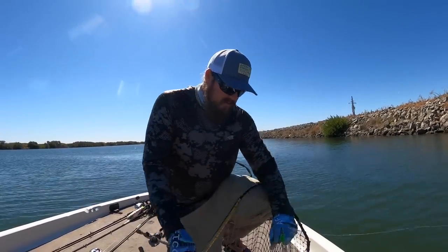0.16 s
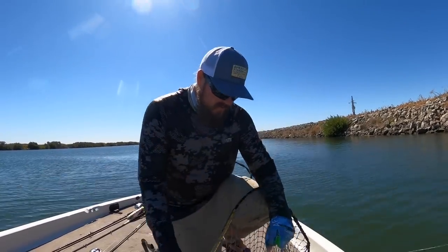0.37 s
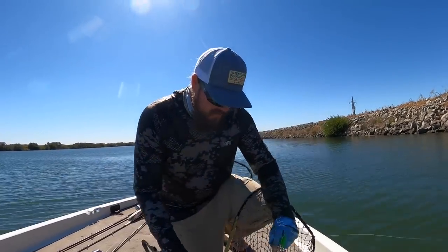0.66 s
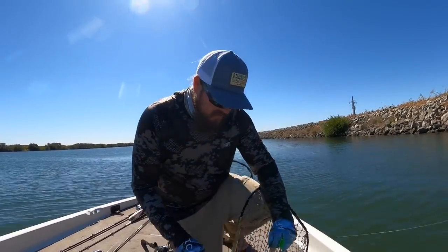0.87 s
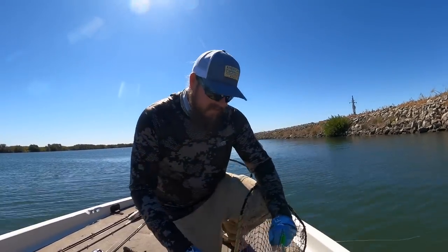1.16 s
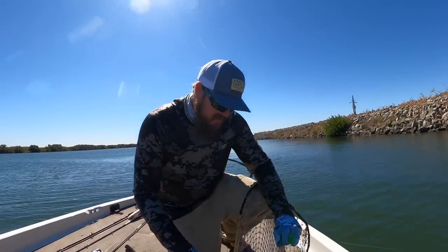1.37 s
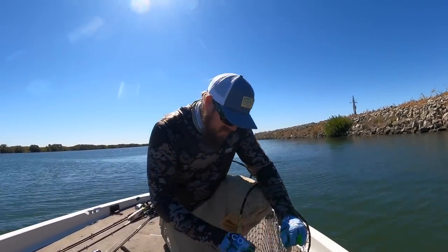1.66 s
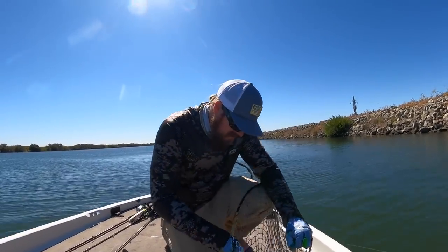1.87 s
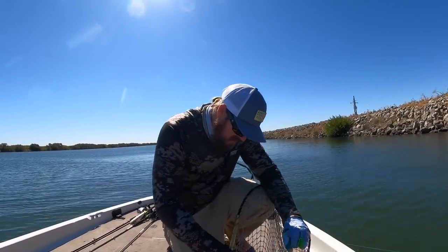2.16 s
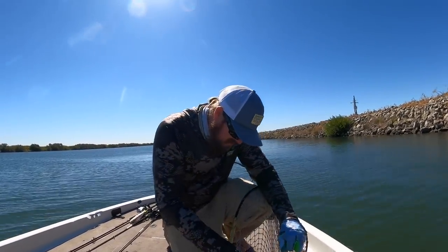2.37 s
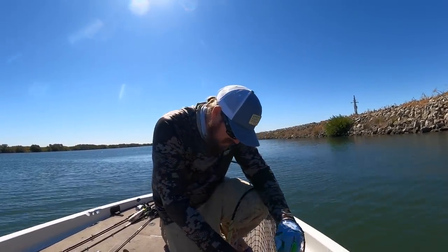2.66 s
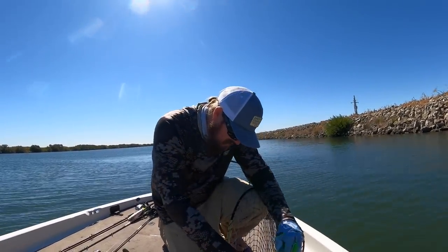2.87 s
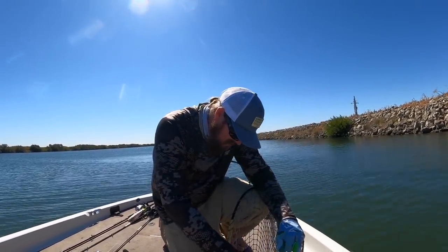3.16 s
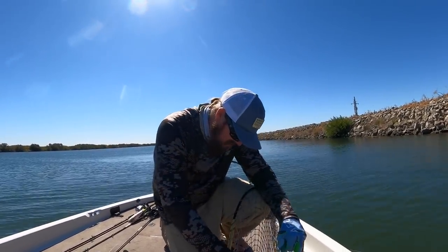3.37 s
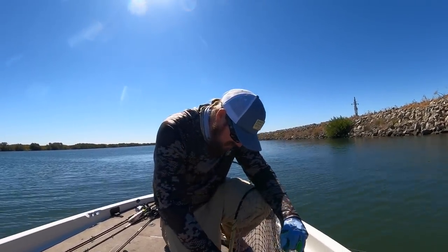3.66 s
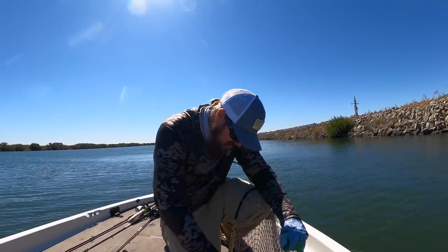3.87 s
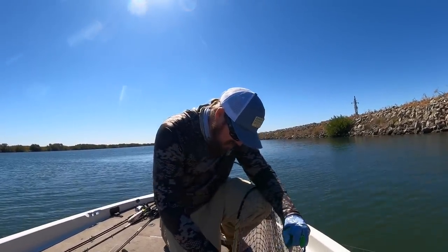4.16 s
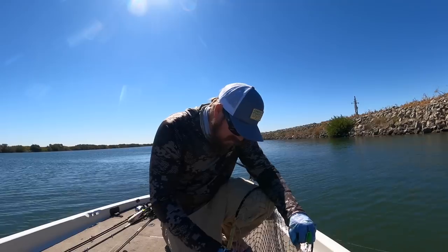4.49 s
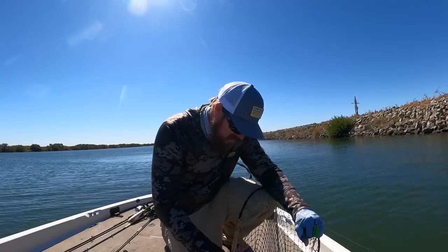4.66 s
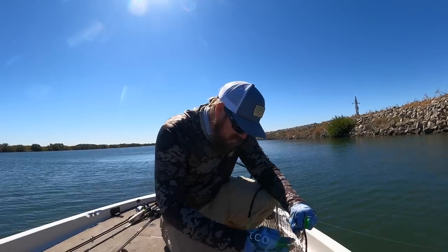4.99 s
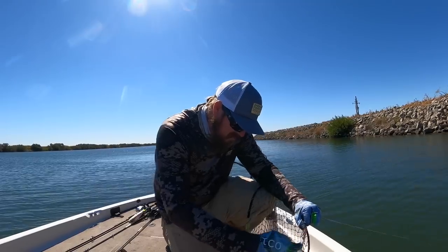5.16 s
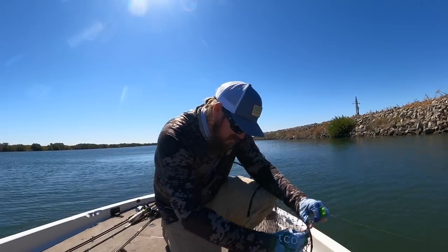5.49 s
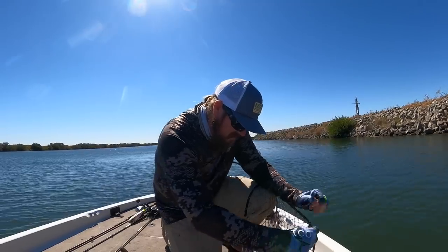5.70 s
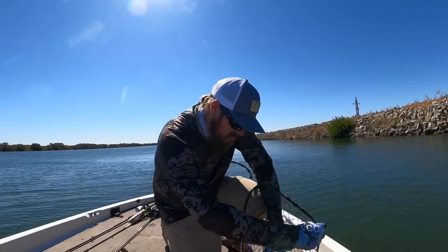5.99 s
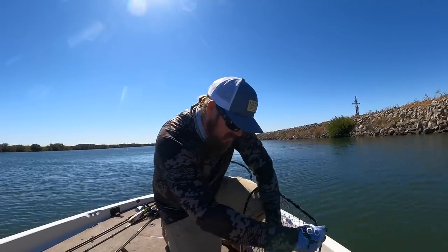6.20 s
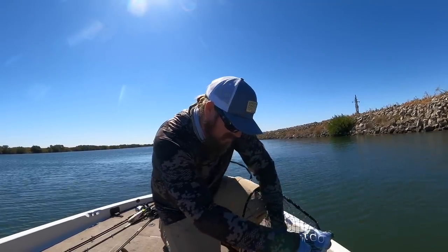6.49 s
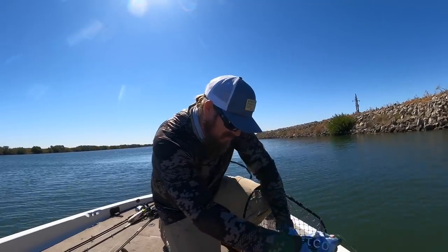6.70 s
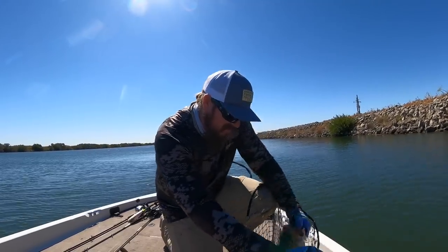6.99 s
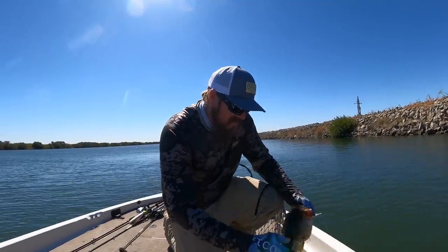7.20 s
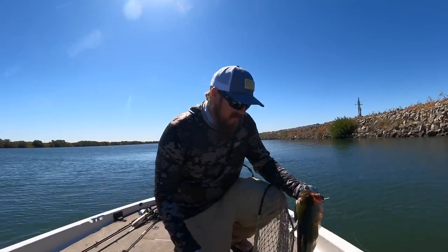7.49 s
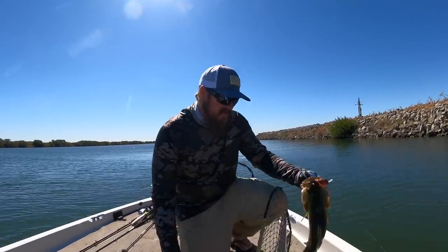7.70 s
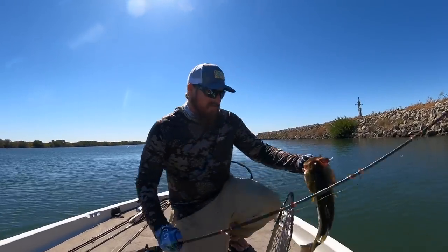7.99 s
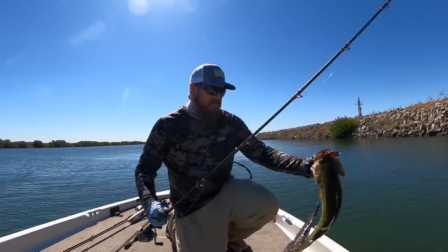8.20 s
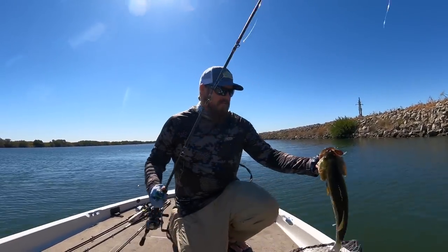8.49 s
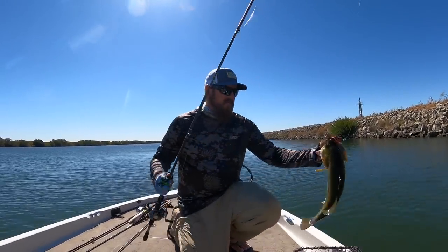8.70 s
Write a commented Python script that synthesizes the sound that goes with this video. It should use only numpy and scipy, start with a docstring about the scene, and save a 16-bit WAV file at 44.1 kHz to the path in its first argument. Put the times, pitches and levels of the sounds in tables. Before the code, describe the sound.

On a small boat, fishing gear cracks, rattles and scrapes in clusters with quiet gaps, a net frame bounces, and soft wind rumbles.

```python
"""Small boat on a calm lake: a rod is laid down, a landing net dragged and dropped, lure hooks tick on gear.
Hard clicks are noise cracks that ring modes of rod and gear; low thumps, from blows on the hollow deck and
probably some wind buffets or water slaps, are dying modes, as is the net frame. Small metal tings.
Mesh scrapes in strokes: dense random slips through broad resonances. A light breeze rumbles on the microphone
and laps the hull, as lumpy filtered noise; open water is a faint wash of noise in drifting patches."""
import sys
import numpy as np
from scipy import signal
from scipy.io import wavfile
from scipy.ndimage import uniform_filter1d

SR = 44100
rng = np.random.default_rng(int(sys.argv[2]) if len(sys.argv) > 2 else 0)


def transcribe(u):
    """Save the signal u as a 16-bit wav file named by the first command-line argument.

    u: samples, shape (n,) or (channels, n), limited to [-1, 1]; the rate is SR.
    q: integer samples, one column per channel.
    """
    v = np.clip(np.atleast_2d(u).T, -1, 1)
    q = np.round(v * 32767).astype(np.int16)
    wavfile.write(sys.argv[1], SR, q)


def field_ratio(decibels):
    """Amplitude ratio for a level in dB (20 dB per decade); scalars and array-likes work."""
    return 10 ** (np.asarray(decibels, dtype=float) / 20)


N = 390285  # samples


def evened(x):
    """Scales to rms 1."""
    return x / np.sqrt(np.mean(x ** 2) + 1e-20)


def peaked(x):
    """Scales to peak 1."""
    return x / (abs(x).max() + 1e-20)


def read(points, hz):
    """Reads a spectrum on a log-frequency axis."""
    f, value = np.transpose(points)
    return np.interp(np.log(hz + 1), np.log(f + 1), value)


def curve(rows, column=1):
    """One column of a time table, one value a sample."""
    return np.interp(np.arange(N) / SR, [r[0] for r in rows], [r[column] for r in rows])


def add(mix, start_s, sound):
    """Mixes a sound in at start_s."""
    part = mix[round(start_s * SR):][:len(sound)]
    part += sound[:len(part)]


def colour(x, points):
    """Minimum-phase filter with the gain of a spectrum table, floored at -100 dB."""
    gain_db = read(points, abs(np.fft.fftfreq(8192, 1 / SR)))
    log_gain = np.log(field_ratio(np.maximum(gain_db, -100)))
    taps = np.fft.ifft(np.exp(np.conj(signal.hilbert(log_gain)))).real[:4096]
    return signal.oaconvolve(x, taps)[:len(x)]


def resonance(x, hz, q):
    """One resonant mode driven by x."""
    return signal.lfilter(*signal.iirpeak(hz, q, SR), x)


def ring(hz, db, t60_s, rise_s, spread):
    """Dying modes, detuned and weighted a little differently every time."""
    t = np.arange(round(.3 * SR))[:, None] / SR
    weight, detune = rng.standard_normal((2, len(hz)))
    decay = field_ratio(db + 2.2 * weight - 60 * t / t60_s)
    modes = decay * np.sin(2 * np.pi * hz * (1 + spread * detune) * t)
    return modes.sum(1) * (1 - np.exp(-(t[:, 0] / rise_s) ** 2))


def crack(hz, t60_s):
    """A sharp first contact, then a weaker chatter of small bounces, strongest around hz."""
    t = np.arange(round(.15 * SR)) / SR
    noise, bounce = rng.standard_normal((2, len(t)))
    chatter = noise * (.35 + 2.2 * (bounce > 2.1)) * field_ratio(-60 * t / t60_s)
    burst = chatter + 2.2 * noise * np.exp(-t / .0012)
    burst[:3] += 7.0 * np.array([.5, 1, -.5])
    wide = signal.lfilter([1, -.85], [1], burst)
    return peaked(0.3 * wide + resonance(burst, hz, 2.2))


def rattled(x, decay_s):
    """A blow is a first contact followed by a few ms of chatter."""
    chatter = 0.018 * rng.standard_normal(600) * np.exp(-np.arange(600) / SR / decay_s)
    chatter[0] = 1
    return peaked(signal.oaconvolve(x, chatter))


def thud(hz, t60_s):
    """Dense low noise whose upper part dies first."""
    t = np.arange(round(.2 * SR)) / SR
    low, high = rng.standard_normal((2, len(t)))
    low_band = signal.butter(2, [0.18 * hz, hz], "band", fs=SR)
    high_band = signal.butter(1, [hz, 2.7 * hz], "band", fs=SR)
    low = signal.lfilter(*low_band, low * field_ratio(-60 * t / t60_s))
    high = signal.lfilter(*high_band, high * field_ratio(-60 * t / (0.45 * t60_s)))
    return peaked(low + 0.34 * high)


# Water and air. Each row: time in seconds, wash level in dB, thin treble hiss level in dB.
WASH_LEVELS = [(0, -49, -68.5), (.47, -51.5, -62), (1.3, -50.5, -81.5), (2.6, -45.5, -97.5), (3, -55, -94),
               (3.6, -54, -99.5), (5.1, -51.5, -94.5), (5.74, -61, -87.5), (6, -52.5, -85),
               (6.6, -51.5, -86.5), (6.8, -51, -78.5), (7.5, -45, -80.5), (8.3, -51, -76.5),
               (8.85, -44.5, -80.5)]
# Wash spectrum; the first and the last two rows are not used. Each row: Hz, relative density in dB per Hz.
WASH_SPECTRUM = [(180, -30), (300, -0.5), (447, -9), (656, -9), (925, -15.5), (1250, -14), (2740, -18.5),
                 (5520, -28), (8000, -25.5), (10400, -75), (17600, -120)]


def wash():
    """Faint wide noise in drifting patches; it brightens when the hiss comes up."""
    frames, hz = N // 128 + 5, np.fft.rfftfreq(512, 1 / SR)
    real, imag, patches = rng.standard_normal((frames, 257, 3)).T
    patches = evened(uniform_filter1d(uniform_filter1d(patches, 8, 0), 16, 1))
    tone_db = read(WASH_SPECTRUM[1:-2], hz) - 40 * (hz < 250)
    times_s, _, hiss_db = np.transpose(WASH_LEVELS)
    lift_db = np.interp(np.arange(frames) * 128 / SR, times_s, hiss_db) - hiss_db.mean()
    tilt_db = .15 * np.outer(np.log2(np.maximum(hz, 1200) / 1200), lift_db)
    z = (real + 1j * imag) * field_ratio(tone_db[:, None] + tilt_db + 2.6 * patches)
    noise = signal.istft(z, nperseg=512, noverlap=384)[1][:N]
    return field_ratio(curve(WASH_LEVELS)) * evened(noise)


# Strength of the breeze. Each row: time in seconds, level in dB.
BREEZE_LEVELS = [(0, -52.5), (.6, -58.5), (.8, -36), (.95, -47), (1.3, -60), (1.65, -44.5), (2.1, -51.5),
                 (3.1, -57), (3.27, -41), (3.42, -53.5), (4.2, -56.5), (4.55, -34), (4.75, -38.5),
                 (4.95, -57.5), (5.55, -62), (7.5, -56.5), (8.2, -59.5), (8.8, -57)]
# Wind on the microphone. Each row: Hz, relative density in dB per Hz.
GUST_SPECTRUM = [(15, -33), (30, -5.5), (60, 4), (100, 6), (150, -2), (250, -52.5)]
# Hull rumble. Each row: Hz, relative density in dB per Hz.
HULL_SPECTRUM = [(60, -44), (120, -2), (190, 3.5), (300, -8), (450, -15), (800, -46)]
LAP_DB, LAP_SHARE = -54, 0.71  # lapping in a breeze of -57.5 dB; dB it follows per dB of breeze
BOOM_DB, BOOM_S = -26, 0.053  # hull rumble against the knocks; time constant of their smoothed power


def breeze(knocks):
    """Lumpy low noise: deep on the microphone, upper from the hull, lapped by water, swelling with knocks."""
    unevenness = uniform_filter1d(uniform_filter1d(rng.standard_normal((2, N)), 900), 900)
    lumps = field_ratio(4.2 * evened(unevenness))
    deep = evened(lumps[0] * colour(rng.standard_normal(N), GUST_SPECTRUM))
    upper = evened(lumps[1] * colour(rng.standard_normal(N), HULL_SPECTRUM))
    keep = np.exp(-1 / (BOOM_S * SR))
    shaken = field_ratio(BOOM_DB) * np.sqrt(signal.lfilter([1 - keep], [1, -keep], knocks ** 2))
    breeze_db = curve(BREEZE_LEVELS)
    lapping = field_ratio(LAP_DB + LAP_SHARE * (breeze_db + 57.5))
    return field_ratio(breeze_db) * deep + (lapping + shaken) * upper


# Hooks, rod and reel. Each row: start in seconds, peak in dB, low gear part against it in dB, brightest Hz.
CLICK_ROWS = [(0.0316, -17, -16.5, 2030), (0.0671, -27, -6, 6600), (0.0922, -24.5, -33, 3320),
              (0.172, -33.5, -28, 4000), (.323, -27, -21, 3270), (0.447, -27, -18, 3130),
              (.47, -16, -22, 2520), (0.5238, 5, -21, 4800), (.5394, -4, -10, 3540),
              (0.5584, -22, -1, 4500), (0.5856, -5, -8.5, 3940), (0.643, -10.5, -9.5, 4970),
              (0.69, -19, -19, 3500), (0.6959, -0.5, -21, 5400), (.7212, -5.5, -23, 4940),
              (0.7298, -15.5, -4, 4930), (0.764, -17, -12, 4940), (0.7774, -11, -24, 5350),
              (0.7954, -10.5, -6, 2600), (0.8686, -10.5, -17, 5500), (0.886, -19, -16, 5630),
              (1.5705, -26, -7.5, 2790), (1.5898, 5.5, -20.5, 4640), (1.646, -24, -1, 2230),
              (1.663, -21.5, -5, 3550), (1.6877, -21, -8, 2480), (1.7044, -19.5, -7.5, 2010),
              (1.7335, -13.5, -18, 2010), (1.7474, -0.5, -12, 2630), (1.8169, -12, -10, 2100),
              (1.8859, -4.5, -7.5, 3020), (1.9133, -5, -9.5, 2980), (1.9432, -13.5, -7.5, 2480),
              (1.969, -14.5, -3.5, 2230), (2.1016, -12.5, -10, 2310), (2.1293, -8, -15.5, 3330),
              (2.218, -18.5, -10, 2620), (2.2503, -15.5, -15, 3420), (2.286, -29, -1, 2110),
              (2.337, -25.5, -25, 3230), (2.3963, -20, -13, 3750), (2.5099, -16.5, -10.5, 3560),
              (2.5654, -21, -8.5, 3860), (2.811, -31, -25, 2810), (3.7802, -32.5, -15, 3920),
              (3.8849, -28, -36, 3880), (3.907, -28.5, -18, 3800), (4.0615, -28.5, -20, 3370),
              (4.3412, -29, -11, 4150), (4.36, -18, -11, 3300), (4.398, -28, -26, 5500),
              (5.7607, -11.5, -27.5, 6400), (5.7882, -20, -21, 6510), (5.8197, -18.5, -25, 5700),
              (5.8594, -27, -21, 6350), (5.9, -40, -20, 6400), (6.2156, -22, -6.5, 2510),
              (7.1492, -8, -26, 5100), (7.172, -16.5, -30, 4440), (7.244, -25, -26, 3520),
              (7.299, -34, -3, 6500), (7.3294, -36, -22, 6500), (7.3448, -21.5, -28, 2750),
              (7.3625, -6.5, -18.5, 2670), (7.445, -33, -12, 2670), (7.4827, -11.5, -18.5, 2670),
              (7.512, -10.5, -21.5, 3230), (7.5258, -7.5, -21, 2580), (7.5377, -10, -16, 2670),
              (7.5855, -25.5, -12, 2630), (7.653, -29, -10, 2230), (7.6942, -21, -12, 2500),
              (7.7798, -29, -10, 2730), (7.852, -15, -18, 2000), (8.5657, -5.5, -36, 6580),
              (8.7148, -28, -6, 3720), (8.7252, 2, -11.5, 3790), (8.7502, -18, -2, 2590),
              (8.7615, -5.5, -21, 3330), (8.828, -30, -9, 3450)]
# Low modes of the gear. Each row: Hz, level in dB, t60 as a factor on the click's.
GEAR_MODES = [(976, -5, 0.76), (1144.6, -5.5, 1.1), (1401, -5.5, 0.81), (1686, 0, 0.5), (2010, -11.5, 1.4)]
# Modes of stiff small parts. Each row: Hz, level in dB.
PART_MODES = [(2330, -17), (2750, 3.5), (3300, 3), (3750, 3), (4200, -0.5), (4650, -3), (5050, 0.5),
              (5400, 3.5), (5850, 3), (6500, 7.5), (7250, 8.5)]
CLICK_T60_S, SHORTER_PER_DB = 0.06, 0.0025  # t60 base of a -24.5 dB click; harder ones are damped sooner
SETTLE_DB, SETTLE_S = -21, 0.023  # settling tick: highest level against its click, mean delay
LIFTED_S, LIFTED_RING = 8.2, .45  # from here the rod is up in open air; its clicks ring this share as long


def clicks():
    """Each click cracks, rings the parts near its pitch, and the gear under it; loose hooks settle after it."""
    out = np.zeros(N)
    part_hz, part_db = np.transpose(PART_MODES)
    gear_hz, gear_db, longer = np.transpose(GEAR_MODES)
    luck = rng.exponential(1, (len(CLICK_ROWS), 2))
    settling = [(s + SETTLE_S * late, db + SETTLE_DB - 4.0 * weak, low_db, hz)
                for (s, db, low_db, hz), (late, weak) in zip(CLICK_ROWS, luck)]
    for s, db, low_db, hz in CLICK_ROWS + settling:
        t60_s = CLICK_T60_S * np.exp(-SHORTER_PER_DB * (db + 24.5))
        if s > LIFTED_S:
            t60_s *= LIFTED_RING
        near_db = part_db - 14 * abs(np.log2(part_hz / hz))
        parts = ring(part_hz, near_db, .5 * t60_s, 0.000081, 0.04)
        hard = peaked(crack(hz, t60_s)[:6000] + .35 * peaked(parts)[:6000])
        gear = ring(gear_hz, gear_db, longer * t60_s, .0004, 0.015)
        add(out, s, field_ratio(db) * hard)
        add(out, s, field_ratio(db + low_db) * rattled(gear, 0.0015))
        add(out, s, field_ratio(db + low_db) * thud(2100, 1.5 * t60_s))
    return out


# Low thumps: blows on the hollow deck, and near 3.2 and 4.4-4.7 s probably wind buffets or water slaps
# on the hull. Each row: start in seconds, peak in dB, main pitch in Hz.
THUMP_ROWS = [(0.045, -39, 375), (.464, -16, 226), (.527, -8.5, 416), (0.54, -14, 287), (.589, -16, 293),
              (0.643, -20, 465), (.676, -12, 565), (0.699, -17, 344), (0.727, -17.5, 354),
              (.763, -14.5, 199), (0.779, -17.5, 118), (.799, -21.5, 544), (0.876, -24.5, 337),
              (1.071, -39.5, 220), (1.371, -23.5, 212), (1.59, -21, 513), (1.751, -25, 291),
              (1.888, -23, 341), (1.915, -24, 321), (2.011, -19.5, 542), (2.224, -32.5, 568),
              (2.567, -38, 561), (3.153, -35, 242), (3.182, -31.5, 254), (3.228, -24, 121),
              (3.272, -32, 127), (3.359, -39.5, 230), (3.678, -33.5, 642), (3.805, -34, 390),
              (3.844, -37.5, 161.5), (4.148, -36, 360), (4.377, -29.5, 132), (4.422, -29, 191),
              (4.534, -22.5, 174), (4.661, -27.5, 192), (4.731, -30, 135.3), (5.764, -31, 380.6),
              (5.858, -33.5, 645), (6.219, -31, 295), (6.565, -38, 646), (7.149, -32, 382),
              (7.296, -25.5, 255.6), (7.919, -38, 578), (8.603, -30.5, 291), (8.722, -18.5, 466),
              (8.762, -16, 250), (8.789, -25, 192)]
# Deck panel modes. Each row: Hz, level in dB.
DECK_MODES = [(200, 2.5), (245, -2.5), (285, 2.5), (335, 5), (410, 2), (470, -6.5), (540, 6.5), (640, -8.5),
              (700, 4.5)]
PANEL_T60_S, PANEL_HZ, PANEL_LOSS = 0.27, 307, 0.83  # longest t60, its pitch, log loss per octave away


def thumps():
    """Low thumps: a mode at the main pitch, with the deck's panel modes weaker the further they lie from it."""
    out, (deck_hz, deck_db) = np.zeros(N), np.transpose(DECK_MODES)
    for s, db, hz in THUMP_ROWS:
        mode_hz = np.append(deck_hz, hz)
        mode_db = np.append(deck_db - 16 * abs(np.log2(deck_hz / hz)), 3)
        t60_s = PANEL_T60_S * np.exp(-PANEL_LOSS * abs(np.log2(hz / PANEL_HZ)))
        add(out, s, field_ratio(db) * peaked(ring(mode_hz, mode_db, t60_s, 0.0015, 0.024)))
    return out


# Strokes over the deck. Each row: peak time in seconds, level in dB, half length in seconds,
# brightness in dB, Hz that sings out.
DRAG_STROKES = [(0.087, -55, 0.032, 26, 1060), (0.539, -26, 0.014, 21, 1070), (0.669, -27, 0.049, 12, 1160),
                (.729, -17, 0.007, 4, 1510), (0.881, -22.5, 0.013, 7.5, 6440), (1.683, -35, 0.038, 9, 3480),
                (1.852, -32.5, 0.011, 15.5, 1930), (2.03, -29, 0.049, -5, 1127),
                (2.141, -39, 0.03, -4, 3200), (2.281, -32, 0.044, -0.5, 3220), (2.437, -49, 0.04, -5, 3600),
                (2.862, -60.5, 0.085, -11, 1420), (4.327, -48.5, 0.052, -0.5, 3600),
                (4.388, -39, 0.029, 3, 946), (4.591, -40.5, 0.067, -8, 950),
                (4.619, -37.5, 0.043, 15.5, 1450), (4.82, -39, 0.07, -0.3, 3430),
                (4.998, -40.5, 0.024, -2.5, 1324), (5.25, -47.5, 0.052, -6, 1710),
                (5.827, -39, 0.073, 7, 6360), (7.182, -45.5, 0.034, 23.5, 1830),
                (7.274, -40.5, 0.04, 6.5, 3470), (7.386, -36, 0.012, 5.5, 2630), (7.536, -40, .04, 5, 2720),
                (7.61, -54, 0.023, -9.5, 2660), (8.758, -33, 0.025, -2.5, 690)]
# Broad resonances of the mesh. Each row: Hz, width in Hz, relative level in dB.
MESH_MODES = [(546, 170, 19.5), (950, 370, 6.5), (1160, 500, -1.5), (1570, 260, 0), (1720, 480, -0.5),
              (2500, 310, 4), (3600, 600, -14.5), (5900, 900, -10.5)]
ONSET_SHARE = .8  # rise in half lengths; the fade takes the rest of two
KNOTS_PER_S, KNOT_DB = 170, 17  # knots that catch hard among the dense slips
RUB_DB, RUB_WIDTH_HZ = -7, 45  # a stroke also wakes the gear's own modes


def drag():
    """Knots slip in dense small ticks that excite broad resonances; each stroke swells and fades."""
    tick_size = field_ratio(1.8 * np.minimum(rng.exponential(1, N), 5)) * (rng.random(N) < 4000 / SR)
    slips = evened(tick_size * rng.standard_normal(N)) + .8 * rng.standard_normal(N)
    uneven_grip = field_ratio(2.6 * evened(uniform_filter1d(rng.standard_normal(N), 300)))
    knots = field_ratio(KNOT_DB) * rng.standard_normal(N) * (rng.random(N) < KNOTS_PER_S / SR)
    slips = slips * uneven_grip + knots
    body = 0.38 * signal.lfilter(*signal.butter(2, [600, 7000], "band", fs=SR), slips)
    for hz, width_hz, db in MESH_MODES:
        body = body + 0.16 * field_ratio(db) * evened(resonance(slips, hz, hz / width_hz))
    for hz, db, _ in GEAR_MODES:
        body = body + field_ratio(RUB_DB + db) * evened(resonance(slips, hz, hz / RUB_WIDTH_HZ))
    dull = signal.lfilter(*signal.butter(1, 1800, fs=SR), body)
    dull, sharp, out = evened(dull), evened(body - dull), np.zeros(N)
    for s, db, half_s, tilt_db, hz in DRAG_STROKES:
        near = np.arange(max(round((s - .3) * SR), 0), min(round((s + .4) * SR), N))
        t = near / SR - s
        stroke = np.exp(-(t / (half_s * np.where(t < 0, ONSET_SHARE, 2 - ONSET_SHARE))) ** 2)
        # low parts sing most
        singing = evened(resonance(slips[near], hz, 14 * np.sqrt(900 / hz))) * 900 / hz
        scrape = dull[near] * field_ratio(-tilt_db) + sharp[near] * field_ratio(tilt_db - 18)
        out[near] += field_ratio(db) * stroke * (scrape + singing)
    return out


# Small metal. Each row: start in seconds, peak in dB, Hz, t60 in seconds.
TING_ROWS = [(0.673, -19, 1148, 0.12), (1.075, -36, 724, 0.048), (1.186, -41, 4420, 0.12),
             (1.187, -39, 2500, 0.022), (2.017, -17.5, 1090, 0.19), (4.364, -26, 11500, 0.14),
             (4.372, -39, 7400, .09), (4.4, -36, 7200, 0.065), (4.405, -35, 950, 0.092),
             (6.218, -31, 955, 0.19), (6.73, -32, 8700, .05), (7.855, -29, 1900, 0.072)]


def tings():
    """Small metal left ringing or squeaking: three close modes that beat."""
    out = np.zeros(N)
    for s, db, hz, t60_s in TING_ROWS:
        modes = ring(hz * np.array([.99, 1, 1.012]), 0, t60_s, 0.0012, 0.0099)
        add(out, s, field_ratio(db) * rattled(modes, .008))
    return out


# The frame falls and bounces. Each row: start in seconds, peak of its ring in dB, crack against it in dB.
DROP_ROWS = [(5.154, -40, 4), (5.163, -29, 8), (5.175, -3, 5), (5.32, -6, 8), (5.372, -11, -1.5),
             (5.396, -13, 1), (5.417, -23, -25)]
# Frame and deck modes. Each row: Hz, level in dB, t60 in seconds.
FRAME_MODES = [(223, -6.5, 0.17), (318.5, -1.5, 0.16), (382.4, -0.5, 0.079), (506, -6.5, 0.14),
               (616, -5, 0.071), (704, -15.5, 0.15), (916, -17.5, 0.063), (1534, -11.5, .05),
               (1770, -3.5, 0.027)]
# The frame's thin tube. Each row: Hz, level against the blow in dB, t60 in seconds.
TUBE_MODES = [(4235, -29, .11), (11950, -29, .075)]


def net_frame():
    """Every bounce rings the same tube and deck modes over a woody thud."""
    out, (hz, mode_db, t60_s) = np.zeros(N), np.transpose(FRAME_MODES)
    soften = signal.butter(1, 6000, fs=SR)
    for s, db, crack_db in DROP_ROWS:
        add(out, s, field_ratio(db) * rattled(ring(hz, mode_db, t60_s, 0.0022, 0.012), 0.0021))
        add(out, s, field_ratio(db + crack_db) * signal.lfilter(*soften, crack(2540, 0.02)))
        add(out, s, field_ratio(db - 4) * thud(800, .12))
        add(out, s, field_ratio(db) * ring(*np.transpose(TUBE_MODES), 0.0013, 0.0018))
    return out


ECHO_S = .0108  # delay from the nearest hard surface
ECHO_DB, LIFTED_ECHO_DB = -10, -19  # against the click; little comes back once the rod is lifted


def scene():
    """Sums all layers; clicks and tings come back once from a near surface, slightly smeared."""
    hits = clicks() + tings()
    smear = .15 * rng.standard_normal(200) * np.exp(-np.arange(200) / 30.)
    smear[0] = 1
    echo = np.append(np.zeros(round(ECHO_S * SR)), smear / np.linalg.norm(smear))
    echo_db = np.where(np.arange(N) > LIFTED_S * SR, LIFTED_ECHO_DB, ECHO_DB)
    hits = hits + field_ratio(echo_db) * signal.oaconvolve(hits, echo)[:N]
    knocks = thumps() + net_frame()
    mono = wash() + breeze(knocks) + hits + knocks + drag()
    return np.array([mono, mono])


def top_cut(x):
    """Nothing passes above the cut-off."""
    return signal.sosfilt(signal.butter(12, 16640, fs=SR, output="sos"), x)


# Microphone behind its housing. Each row: Hz, gain in dB.
MIC_RESPONSE = [(20, -7.5), (60, -0.5), (120, -0.5), (6000, -0.5), (7200, -9.5), (8200, -14.5),
                (9100, -28.5), (10200, -18.5), (11900, -16), (13000, -33), (15800, -49), (16600, -84.5)]
# Opposite-signed part in the two ports. Each row: Hz, gain in dB.
SIDE_RESPONSE = [(700, -76), (1400, -48), (3000, -37.5), (6000, -27), (9000, -23), (11000, -10),
                 (14000, -4)]
# Thin hiss of each port. Each row: Hz, relative density in dB per Hz.
HISS_SPECTRUM = [(8000, -40), (9500, -3), (11000, 1.5), (12000, -4.5), (13200, -11), (15000, -27.5)]


def record(dry):
    """Microphone colour; the two ports differ mostly in the treble, each with its own thin hiss."""
    mid = colour(dry.mean(0), MIC_RESPONSE)
    scatter = rng.standard_normal(200) * np.exp(-np.arange(200) / 60.)
    scattered = signal.oaconvolve(mid, scatter / np.linalg.norm(scatter))[:N]
    side = colour(scattered, SIDE_RESPONSE)
    hiss_gain = field_ratio(curve(WASH_LEVELS, column=2))
    left_hiss, right_hiss = [hiss_gain * evened(colour(rng.standard_normal(N), HISS_SPECTRUM)) for _ in "LR"]
    mix = np.clip([mid + side + left_hiss, mid - side + right_hiss], -.96, .96)
    return top_cut(mix)


dry = scene()
out = record(dry)
transcribe(out)
```